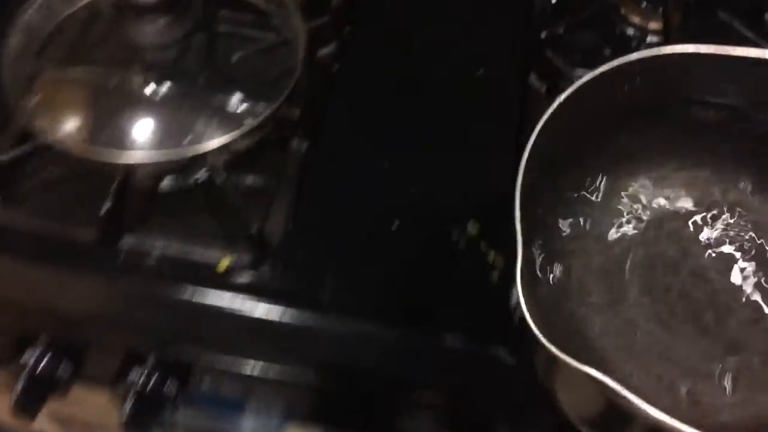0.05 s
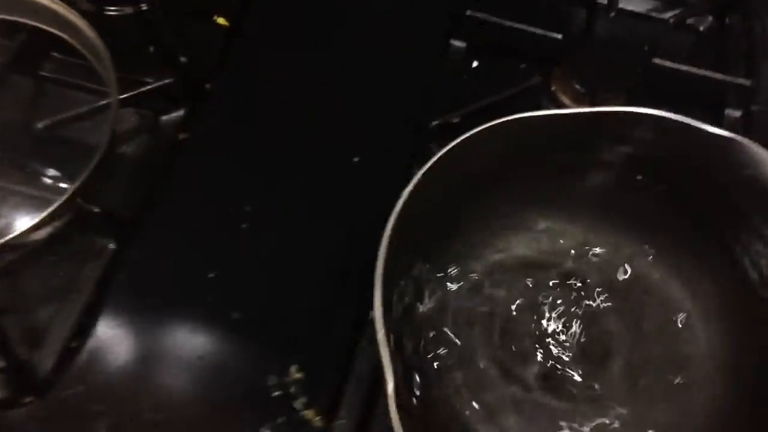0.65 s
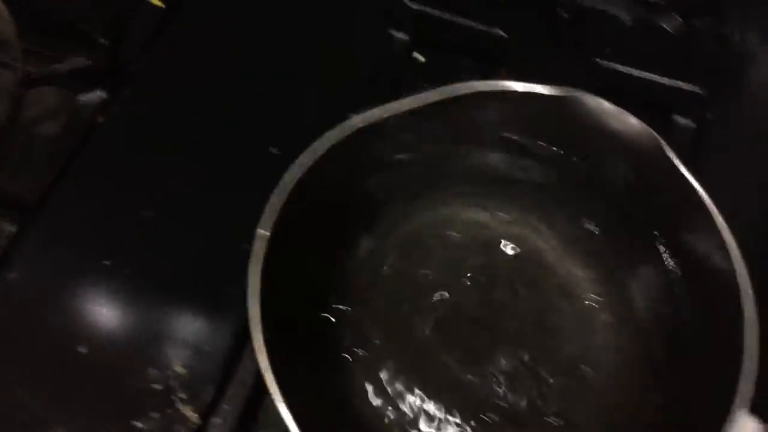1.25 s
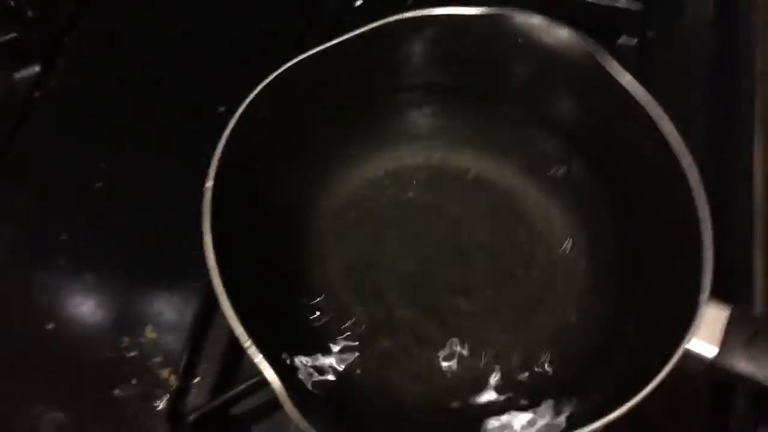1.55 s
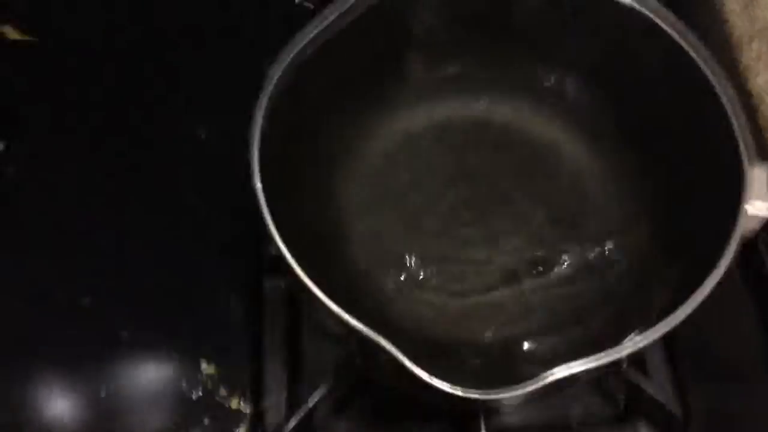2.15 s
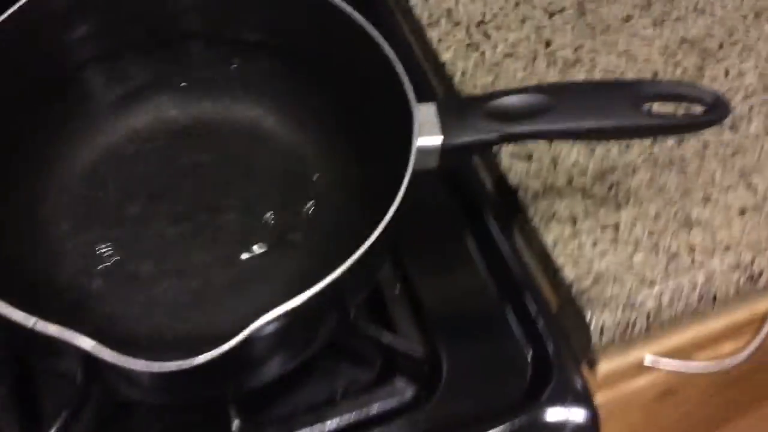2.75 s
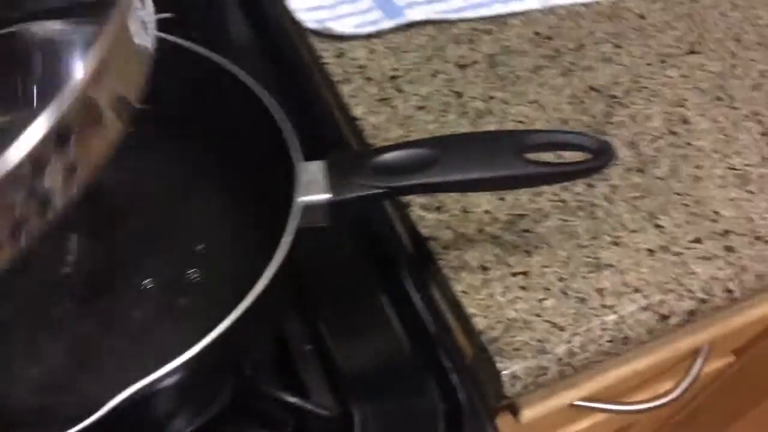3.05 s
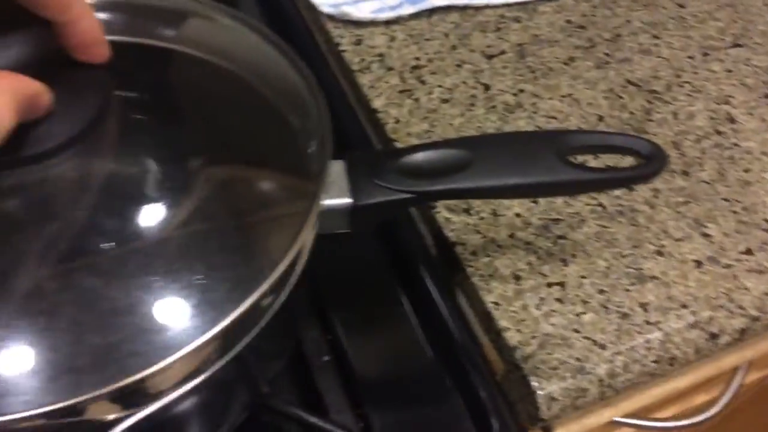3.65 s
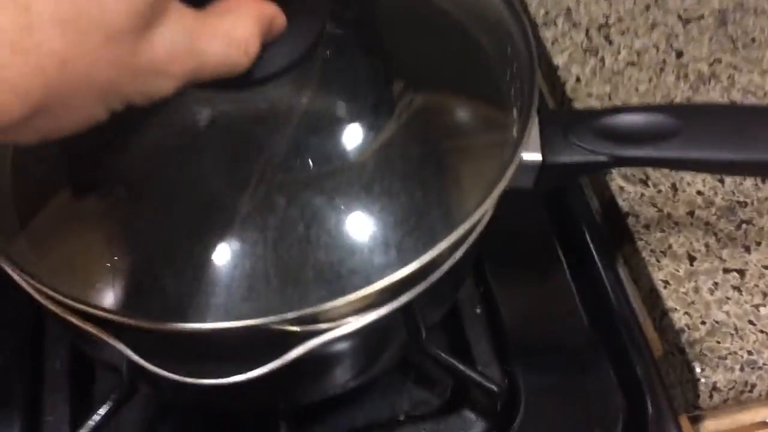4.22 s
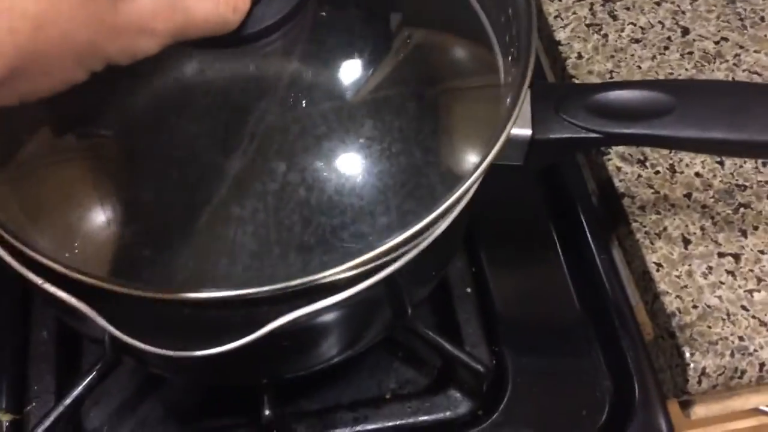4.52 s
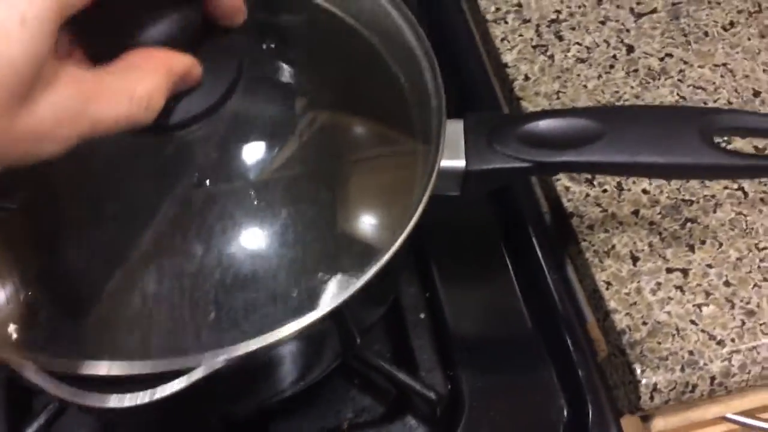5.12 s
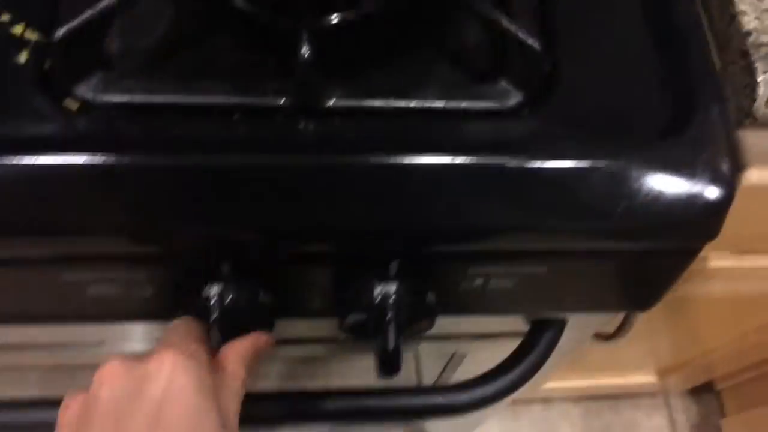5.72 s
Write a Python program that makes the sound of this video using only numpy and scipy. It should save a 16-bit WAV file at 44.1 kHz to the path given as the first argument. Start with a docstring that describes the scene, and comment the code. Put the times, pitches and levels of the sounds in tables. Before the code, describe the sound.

A saucepan of water clanks onto a gas stove grate and rocks, then a glass lid clatters shut and the igniter snaps once.

```python
"""A faint brush of fingers, then a saucepan of water crashes onto the iron grate of a gas stove.
Nudged into place, it grinds, rocks and sloshes; the sheet-steel stove booms under the blows.
A glass lid lands on its edge, drops shut and is twisted home; a knob is pushed, the igniter
sparks once and gas hisses. The microphone is at arm's length, in a small, quiet kitchen."""
import sys
import numpy as np
from scipy import signal
from scipy.fft import rfft, irfft
from scipy.io import wavfile

SR = 44100
rng = np.random.default_rng(int(sys.argv[2]) if len(sys.argv) > 2 else 0)


def waveform_to_disk(signal):
    """Save audio, clipped to [-1, 1], as 16-bit WAV at the path in sys.argv[1]."""
    frames = np.transpose(np.atleast_2d(signal))
    scaled = np.clip(frames, -1, 1) * 32767
    samples = np.round(scaled).astype(np.int16)
    wavfile.write(sys.argv[1], SR, samples)


N = 263718
T = np.arange(SR) / SR  # one second of ringing
TOP_HZ = 15300  # upper edge of the microphone's range

# the pan landing, prong after prong: start_s, level_db
PAN_LANDING = [(0.3663, -20.5), (0.3722, -14.5), (0.3751, -20.5), (0.381, -23.5), (0.395, -22.5),
               (.4110, -32)]
# modes of the pan and of the stove's steel panels: pitch_hz, relative_db, t60_s
PAN_MODES = [(272, -2, .22), (398, 2, .22), (516, 2, .25), (667, -4, .28), (748, -6, .3), (877, -7, .28),
             (1006, -4, .25), (1135, -5, .25), (1232, -5, .25), (1577, -4, .2), (1744, -4, .2),
             (1848, -1, .2), (1986, -3, .18), (2153, -8, .16), (3095, -9, .18), (9711, -12, .18)]
STOVE_MODES = [(89, -9, .5), (124, -11, .25), (160, -4, .3), (181, 0, .17), (198, -2, .33), (268, -6, .3)]
# colour of the crash: frequency_hz, relative_db
CRASH_COLOUR = [(40, -25.5), (80, -11.5), (130, 2), (260, 2), (600, -3.5), (1300, -1.5), (2000, -5),
                (2700, -9.5), (4500, -11), (7000, -15), (10000, -16.5), (15000, -27)]
# ring times of the crash: frequency_hz, t60_s
CRASH_DECAY = [(100, 0.2), (1000, 0.083), (4000, 0.12), (14000, 0.084)]
def saucepan(ring_db=-8, boom_db=-24):
    """The pan crashes onto the prongs, rings and shakes the stove."""
    out = np.zeros(N)
    for s, db in PAN_LANDING:
        add(out, s, undb(db + ring_db) * ring(PAN_MODES))
        add(out, s, blow(wash(CRASH_COLOUR, CRASH_DECAY), db))
    add(out, PAN_LANDING[0][0], undb(boom_db) * ring(STOVE_MODES))
    return out


# single knocks of the pan on a prong, as it is pushed or starts to rock:
# start_s, knock_db, boom_db, tick_db, prong_hz
PRONG_KNOCKS = [(0.565, -39.5, -31.5, -54.5, 1150), (0.66, -44, -31, -79, 467), (1.141, -30, -26, -46, 578),
                (1.157, -37.5, -32, -68, 764), (1.204, -45, -50, -74, 820), (1.289, -39.5, -38, -65, 700),
                (1.395, -41, -38, -54, 634), (1.516, -53, -38, -60.5, 610), (2.959, -37, -34, -44, 430),
                (3.044, -43, -37.5, -52, 480), (5.19, -36, -35.5, -57.5, 436)]
# the pan rocking to rest: start_s, count, first_gap_s, gap_ratio, knock_db, tick_db, loss_db, prong_hz
PAN_ROCKS = [(1.807, 3, .064, 0.96, -36, -55, 2.5, 413), (2.005, 4, 0.042, 0.69, -34.5, -53, 3, 645),
             (2.378, 2, 0.078, 1, -36.5, -44, 2.5, 414), (2.577, 3, .041, .75, -34.5, -47.5, 4.5, 640),
             (3.115, 3, .051, .65, -37.5, -52.5, 3, 630), (5.378, 5, .075, .84, -41.5, -65, 2.5, 580)]
def grate_contacts(boom_over_knock_db=2):
    """List the knocks and rocks; a rocking pan comes back weaker each time, and usually sooner."""
    contacts = list(PRONG_KNOCKS)
    for s, count, gap_s, gap_ratio, knock_db, tick_db, loss_db, prong_hz in PAN_ROCKS:
        for k in range(count):
            knock = knock_db - k * loss_db
            contacts.append((s, knock, knock + boom_over_knock_db, tick_db - k * loss_db, prong_hz))
            s += gap_s * gap_ratio ** k
    return contacts


# modes of the iron grate: pitch_hz, relative_db, t60_s
GRATE_MODES = [(332.2, -1, 0.27), (404, -1, 0.32), (485, -6.5, 0.28), (634, -3.5, .12), (678, 9, 0.033),
               (779.5, -0.5, 0.15), (1123, -1, 0.12), (1310, -5, .08), (1724, 2, 0.032), (1836, -19, 0.12)]
# colours of the loose grate's hollow clack and the tick on a prong: frequency_hz, relative_db
CLACK_COLOUR = [(150, -46.5), (350, 4.5), (680, -4.5), (900, -1.5), (1200, -1), (1850, -9), (2400, -17),
                (3500, -32.5), (9000, -74)]
TICK_COLOUR = [(1000, -44.5), (2200, 3.5), (3500, 3), (4900, 7.5), (6000, 1), (10000, -6), (15000, -14.5)]
def rocking(lag_s=.001):
    """Each tilt ticks on a prong, rings the pan faintly, knocks the grate and sets the stove booming."""
    out = np.zeros(N)
    wall_modes = [mode for mode in PAN_MODES if 1400 < mode[0] < 4000]
    thump_colour = [(30, -25), (90, 12), (190, 12.5), (300, 3.5), (700, -57)]
    for s, knock_db, boom_db, tick_db, prong_hz in grate_contacts():
        thump = noise(thump_colour, SR) * fade(t60=.23)
        boom = undb(boom_db - 6) * ring(STOVE_MODES) + undb(boom_db - 5) * thump
        prong = undb(6) * ring([(prong_hz, 0, .031)])
        grate = undb(-1) * ring(GRATE_MODES)
        clack = blow(noise(CLACK_COLOUR, SR) * fade(t60=.13), db=-6)
        knock = undb(knock_db) * (prong + grate + clack)
        tick = blow(noise(TICK_COLOUR, SR) * fade(t60=.078), tick_db - 3)
        pan_wall = undb(knock_db - 13) * ring(wall_modes)
        add(out, s + lag_s, (boom + knock) * swell(rise_s=.00096) + tick + pan_wall)
    return out


# pushes of the pan over the grate: start_s, length_s, level_db
PAN_DRAGS = [(.52, 0.518, -51), (1.12, 0.067, -46.5), (1.42, .15, -56.5), (2.46, 0.12, -47.5)]
# colour of the grinding: frequency_hz, relative_db
GRIND_COLOUR = [(80, -18), (190, 17.5), (320, -4), (900, -1.5), (1900, -10.5), (3000, -21.5), (4700, -21),
                (9000, -28.5), (15000, -29)]
def dragging():
    """The pan's base grinds on the iron, keeping the grate ringing."""
    push = pressure(PAN_DRAGS, attack_s=.0068, sag_db_per_s=1.5, release_t60=.41)
    return sliding(push, GRIND_COLOUR, GRATE_MODES, grain_db=3, ring_db=-8)


# brief squeaks and ringing tones of the pan and lid: start_s, level_db, pitch_hz, t60_s
BRIEF_TONES = [(2.473, -51, 2600, 0.077), (2.507, -40, 2540, 0.055), (2.518, -45, 2420, 0.032),
               (2.62, -52, 1410, 0.37), (5.058, -42, 766, 0.088)]
def squeaks_and_rings():
    """The pan and lid give brief squeaks and rings, each one dying tone."""
    return tones(BRIEF_TONES, rise_s=.0026)


# modes of the glass lid: pitch_hz, on_edge_db, seated_db, t60_s
LID_MODES = [(409, -1, -8, .26), (620, -3, -14, .25), (721, -12, -7, .2), (780, -20, -7, .2),
             (936, -14, -5, .2), (1187, -22, 1, .24), (1266, 3, -4, .25), (1356, -14, -2, .18),
             (1485, -16, -10, .3), (1626, -8, -11, .2), (2061, -18, -7, .22), (2424, -12, -14, .24),
             (2645, -7, -17, .18), (3031, -1, -25, .27), (3154, -10, -6, .27), (3391, -6, -17, .17),
             (3860, -6, -14, .2), (4320, -5, -20, .2), (4665, -6, -16, .17), (9942, -11, -22, .14)]
def lid_modes(seated):
    """From on edge (0) to seated (1), the rim favours other modes of the lid and damps them all."""
    damping = 1 - .55 * seated
    return [(hz, edge + seated * (flat - edge), t60 * damping) for hz, edge, flat, t60 in LID_MODES]


# the lid meeting the rim: start_s, clash_db, ring_db, air_hz
LID_CONTACTS = [(3.4125, -19.5, -26, 540), (3.4359, -25, -31, 588), (3.504, -37, -49, 537),
                (3.534, -43, -41.5, 554), (3.6628, -21.5, -18, 448), (3.676, -27.5, -53, 500),
                (3.7457, -26.5, -28.5, 424.6), (3.921, -49, -75, 447), (4.069, -48.5, -49, 391),
                (4.3466, -38, -44.5, 466), (5.0185, -39.5, -46.5, 405)]
# colour of glass clashing on steel: frequency_hz, relative_db
CLASH_COLOUR = [(40, -37), (100, 5), (300, 7), (600, 6.5), (950, -3), (1300, -5.5), (2000, -8.5),
                (3300, -9), (5000, -8.5), (7500, -11.5), (10000, -14.5), (15000, -21)]
def lid(shut_s=3.65, air_db=1.5, air_t60=.32, choke_s=.066, soft_db=-9):
    """Glass and steel rim ring at each contact; the air in the pan sounds lower as the gap closes."""
    out = np.zeros(N)
    for s, clash_db, ring_db, air_hz in LID_CONTACTS:
        seated = float(s > shut_s)
        glass = undb(ring_db) * ring(lid_modes(seated), scatter_db=2.5)
        air = undb(ring_db + air_db) * ring([(air_hz, 0, air_t60)])
        choke = np.exp(-(T / choke_s) ** 2)  # the air note holds, then dies as the rim settles
        # a gentle touch of the seated lid lasts longer, so it is duller than a drop
        dull_db = soft_db * seated * np.interp(clash_db, [-40, -28], [1, 0])
        clash = tint(noise(CLASH_COLOUR, SR), [(1800, .013), (3000, dull_db), (14000, 2 * dull_db)])
        add(out, s, glass + air * choke + blow(clash * fade(t60=.12), clash_db))
    return out


# the lid skidding after each drop, then twisted home: start_s, length_s, level_db
LID_SLIPS = [(3.412, .13, -35.5), (3.66, 0.094, -38.5), (4.185, 0.034, -63.5), (4.345, .22, -60.5),
             (4.61, 0.064, -61), (4.75, 0.038, -57.5), (4.96, 0.11, -53.5)]
# colour of the scrape on the rim: frequency_hz, relative_db
SCRAPE_COLOUR = [(150, -10.5), (480, 22), (800, 6), (1300, -4), (2200, 2), (2800, -5), (3400, 6.5),
                 (4300, -2.5), (6000, -1.5), (9000, -6.5), (15000, -24)]
def lid_scrape():
    """The lid rubs on the rim, ringing the glass and the air closed in beneath it."""
    shut_air = [(459.4, 13.7, .13)]  # pitch_hz, relative_db, t60_s
    twist = pressure(LID_SLIPS, attack_s=.0059, sag_db_per_s=15, release_t60=.13)
    return sliding(twist, SCRAPE_COLOUR, lid_modes(seated=.69) + shut_air, grain_db=0, ring_db=2.5)


# dull booms of the stove's steel panels: start_s, level_db, pitch_hz
PANEL_THUDS = [(.369, -16.5, 172.4), (0.701, -37, 188.6), (1.141, -28.5, 177.7), (1.522, -37.5, 166.3),
               (2.574, -30.5, 181.8), (3.411, -21.5, 188.8), (3.662, -32, 178.3), (4.07, -40, 181.3),
               (4.792, -46, 180), (5.04, -26, 174.7), (5.044, -33, 266), (5.249, -37, 261.4),
               (5.712, -37.5, 184.6), (5.812, -44, 268)]
def stove_thuds(panel_t60=.18, deep_hz=89, deep_db=-17, deep_t60=.45):
    """Heavy pushes wake one panel mode and, more slowly, the deep note of the whole stove top."""
    panel = [(s, db, hz, panel_t60) for s, db, hz in PANEL_THUDS]
    deep = [(s, db + deep_db, deep_hz, deep_t60) for s, db, _ in PANEL_THUDS]
    return tones(panel, rise_s=.002) + tones(deep, rise_s=.0098)


# modes of the spark's snap: pitch_hz, relative_db, t60_s
SPARK_MODES = [(2810, -0.5, 0.019), (3810, -5.5, 0.019), (4310, -12, 0.028), (5400, -15, 0.0037),
               (6900, -9, 0.0026)]
# colour of the hollow hob: frequency_hz, relative_db
HOB_COLOUR = [(300, -1), (800, 0), (1200, 8.5), (1900, -2), (3000, -12), (6000, -23), (14000, -36)]
def igniter(start_s=5.804, snap_db=-29, hob_db=-40, hob_lag_s=.00262, gas_db=-60):
    """The spark snaps, the hollow hob answers, and gas starts to hiss."""
    out = np.zeros(N)
    gas_colour = [(200, -6), (1200, -10), (3000, -21), (8000, -26), (15000, -37)]
    add(out, start_s, undb(snap_db) * ring(SPARK_MODES, scatter_db=3))
    add(out, start_s + hob_lag_s, blow(noise(HOB_COLOUR, SR) * fade(t60=.24), hob_db))
    add(out, start_s, undb(gas_db) * noise(gas_colour, SR) * swell(rise_s=.031))
    return out


# water sloshing against the pan wall: start_s, level_db, centre_hz, length_s
WATER_SLAPS = [(1.444, -61.5, 6200, 0.0045), (1.47, -66, 6300, 0.058), (2.084, -47.5, 9500, 0.0046),
               (2.104, -58, 8000, 0.0041), (2.177, -47, 8160, 0.017), (2.178, -50.5, 2160, 0.016),
               (2.47, -54.5, 6860, 0.017), (2.494, -63.5, 7750, 0.1)]
def water(bubbles=48, decay_cycles=3, spread_octaves=.79):
    """Each slap of water is a cloud of tiny bubbles scattered round a centre pitch."""
    out, t = np.zeros(N), T[:SR // 50]
    for s, db, centre_hz, length_s in WATER_SLAPS:
        cloud = np.zeros(SR // 5)
        for when, pitch, strength in rng.random((bubbles, 3)):
            hz = min(centre_hz * 2 ** (spread_octaves * (2 * pitch - 1)), TOP_HZ)
            bubble = np.sin(2 * np.pi * hz * t) * np.exp(-t * hz / decay_cycles)
            add(cloud, when * length_s, strength * bubble)
        add(out, s, cloud * undb(db) * np.sqrt(length_s * SR / np.sum(cloud ** 2)))
    return out


# fingers on the handle, the lid and the knob: start_s, level_db, centre_hz, length_s
FINGER_BRUSHES = [(0.199, -65.5, 2200, .15), (0.212, -66.5, 6496, 0.12), (5.03, -46, 3540, 0.033),
                  (5.233, -52.5, 9800, 0.046), (5.233, -55.5, 2800, 0.047), (5.688, -61.5, 3800, 0.062)]
def fingers(skirt_db=-17):
    """Skin slips over a surface: a band of hiss that swells and stops."""
    out = np.zeros(N)
    for s, db, hz, length_s in FINGER_BRUSHES:
        stroke = np.sin(np.pi * np.minimum(T / length_s, 1)) ** 2
        band = [(hz / 10, 2 * skirt_db), (hz / 2, skirt_db), (hz, 0),
                (hz * 2, skirt_db), (hz * 10, 2 * skirt_db)]
        add(out, s, undb(db) * stroke * noise(band, SR))
    return out


# colour of the kitchen's reflections at the microphone: frequency_hz, relative_db
ROOM_COLOUR = [(50, 4.5), (200, 0.5), (1500, -3.5), (4000, -6), (9000, -3.5), (15000, -16)]
# ring times of the small room: frequency_hz, t60_s
ROOM_DECAY = [(100, .6), (450, .42), (2000, .45), (6000, .33), (14000, .22)]
def kitchen(direct, wet_db=-11.5, null_hz=235, null_width_hz=35, null_depth=.59):
    """Hard counters and cupboards give a short reverberation; a near reflection thins one low band."""
    tail = wash(ROOM_COLOUR, ROOM_DECAY) * swell(rise_s=.016) ** 2
    mid_gain = np.sqrt(np.mean(abs(rfft(tail)[300:2000]) ** 2))
    heard = direct + undb(wet_db) * signal.fftconvolve(direct, tail / mid_gain)[:N]
    null_band = signal.iirpeak(null_hz, null_hz / null_width_hz, fs=SR)
    return heard - null_depth * signal.lfilter(*null_band, heard)


# room tone of the quiet kitchen: frequency_hz, relative_db
ROOM_TONE = [(25, -6.5), (50, -8.5), (90, -5), (170, -1.5), (300, -4), (500, -13), (900, -18), (2000, -23),
             (4000, -28), (15000, -35.5)]
# an appliance's steady hum: pitch_hz, level_db
APPLIANCE_HUM = [(59.5, -61), (641, -76.5)]
def background(floor_db=-61):
    """Room rumble, faint hiss and an appliance's hum lie behind the stove."""
    t = np.arange(N) / SR
    hum = sum(undb(db) * np.sqrt(2) * np.sin(2 * np.pi * hz * t) for hz, db in APPLIANCE_HUM)
    return undb(floor_db) * noise(ROOM_TONE, N) + hum


def ring(modes, scatter_db=2):
    """Damped modes of unit starting power; shares vary by blow, and neighbours swing opposite ways."""
    hz, db, t60 = np.transpose(modes)
    gain = undb(db + scatter_db * rng.standard_normal(len(hz))) * (-1) ** np.arange(len(hz))
    ringing = sum(g * np.sin(2 * np.pi * f * T) * fade(d) for f, g, d in zip(hz, gain, t60))
    return ringing / np.sqrt(np.sum(gain ** 2) / 2)


def wash(colour, t60s):
    """Modes too dense to tell apart: octave bands of noise, each dying at its own pace."""
    spectrum = rfft(noise(colour, SR))
    octave = np.log2(np.fft.rfftfreq(SR, 1 / SR) + 1)
    out = np.zeros(SR)
    for k in range(5, 15):
        band = irfft(spectrum * np.maximum(1 - abs(octave - k), 0), SR)
        out += band * fade(along(t60s, 2. ** k))
    return out


def tones(rows, rise_s):
    """Pushes and slips that each wake a single mode."""
    out = np.zeros(N)
    for s, db, hz, t60 in rows:
        add(out, s, undb(db) * ring([(hz, 0, t60)]) * swell(rise_s))
    return out


def pressure(strokes, attack_s, sag_db_per_s, release_t60):
    """Each stroke bites, eases off as it goes and lets go."""
    out = np.zeros(N)
    for s, length_s, db in strokes:
        release = np.exp(-np.log(1000) * np.maximum(T - length_s, 0) / release_t60)
        add(out, s, undb(db - sag_db_per_s * T) * swell(attack_s) * release)
    return out


def sliding(force, colour, modes, grain_db, ring_db):
    """Tiny uneven slips hiss and keep the rubbed body ringing."""
    slips = rng.standard_normal(N)
    grain = np.repeat(rng.standard_normal(N // 128 + 1), 128)[:N]  # a new value about every 3 ms
    slips *= undb(grain_db * grain)
    hiss = tint(slips, colour)
    ringing = signal.fftconvolve(slips, ring(modes))[:N]
    return force * (hiss / hiss.std() + undb(ring_db) * ringing / ringing.std())


def undb(db):
    """Decibels to gain."""
    return 10 ** (np.asarray(db) / 20)


def along(points, hz):
    """Read (frequency_hz, value) points on a log-frequency axis."""
    frequencies, values = np.transpose(points)
    return np.interp(np.log(hz + 1), np.log(frequencies), values)


def swell(rise_s):
    """A soft onset with time constant rise_s."""
    return 1 - np.exp(-T / rise_s)


def fade(t60):
    """Exponential decay that loses 60 dB in t60 seconds."""
    return np.exp(-np.log(1000) * T / t60)


def tint(x, colour):
    """Give a signal a (frequency_hz, gain_db) colour."""
    hz = np.fft.rfftfreq(len(x), 1 / SR)
    return irfft(rfft(x) * undb(along(colour, hz)), len(x))


def noise(colour, size):
    """Coloured noise of unit rms."""
    x = tint(rng.standard_normal(size), colour)
    return x / x.std()


def blow(x, db):
    """Scale a sound so that its first 10 ms have the given level."""
    return x * undb(db) / np.sqrt(np.mean(x[:SR // 100] ** 2))


def add(track, s, x):
    """Mix a sound into a track, starting at s seconds."""
    i = int(s * SR)
    track[i:i + len(x)] += x[:max(len(track) - i, 0)]


def scene():
    """Everything on the stove, heard in mono from arm's length."""
    cookware = saucepan() + rocking() + dragging() + squeaks_and_rings() + lid() + lid_scrape()
    direct = cookware + water() + fingers() + stove_thuds() + igniter()
    return (kitchen(direct) + background())[None]


def record(dry):
    """The microphone thins the deepest bass and cuts the top."""
    low_cut = signal.butter(2, 35, "high", fs=SR, output="sos")
    high_cut = signal.ellip(8, .2, 70, TOP_HZ, fs=SR, output="sos")
    return signal.sosfilt(high_cut, signal.sosfilt(low_cut, dry))


dry = scene()
out = record(dry)
waveform_to_disk(out)
```